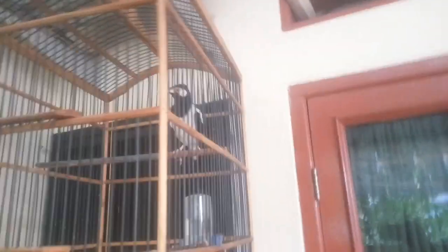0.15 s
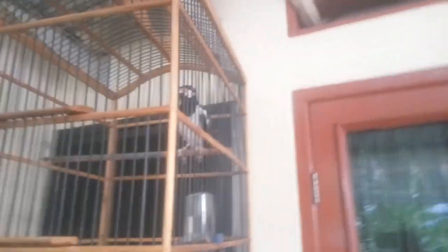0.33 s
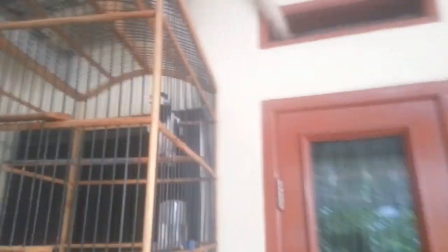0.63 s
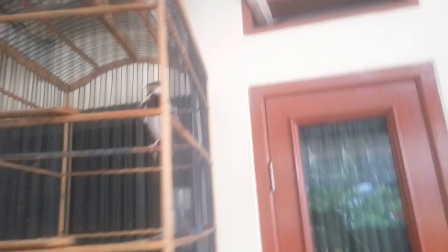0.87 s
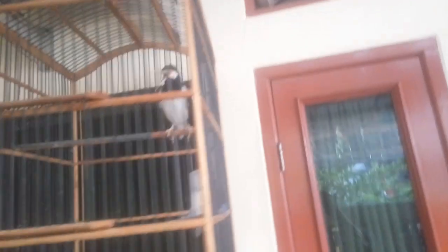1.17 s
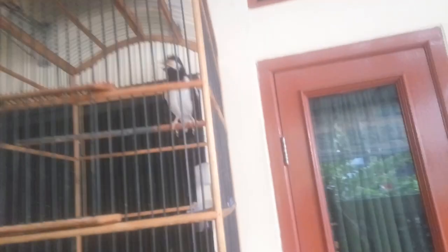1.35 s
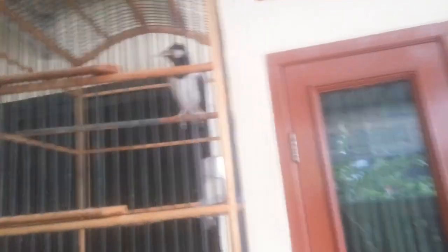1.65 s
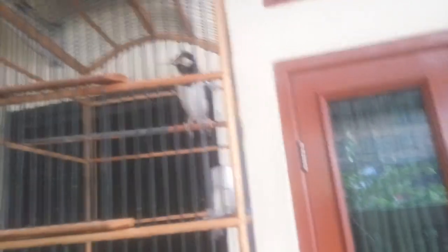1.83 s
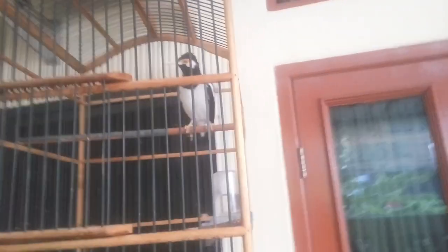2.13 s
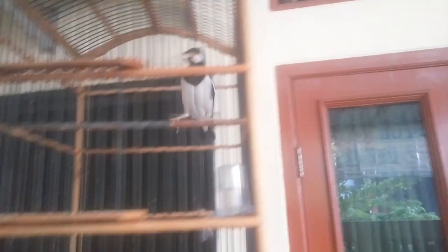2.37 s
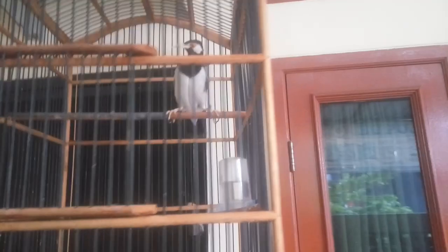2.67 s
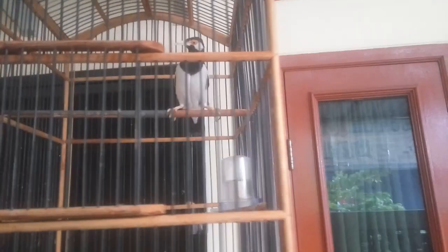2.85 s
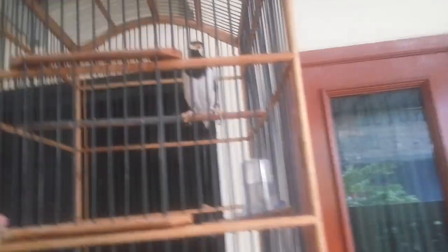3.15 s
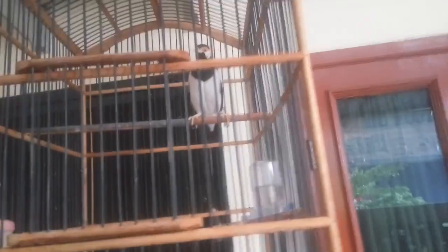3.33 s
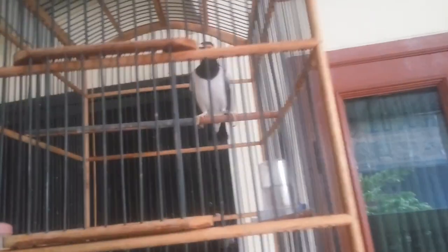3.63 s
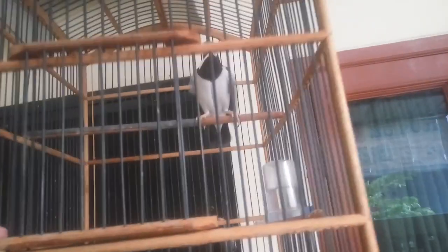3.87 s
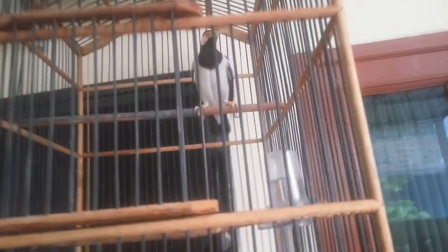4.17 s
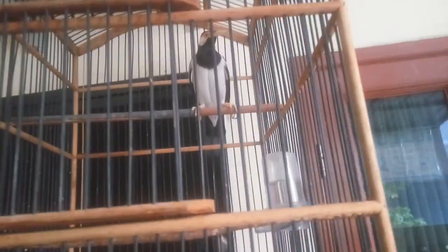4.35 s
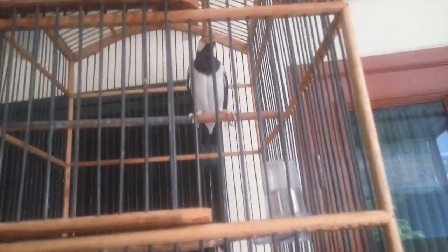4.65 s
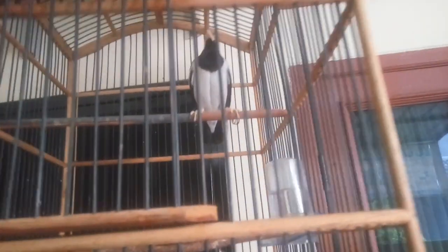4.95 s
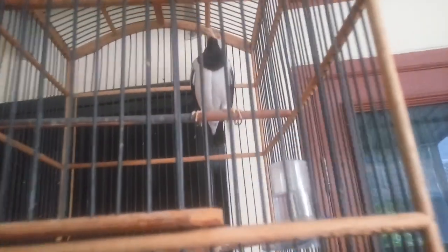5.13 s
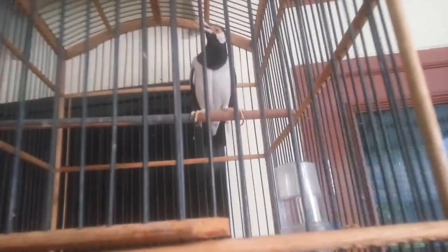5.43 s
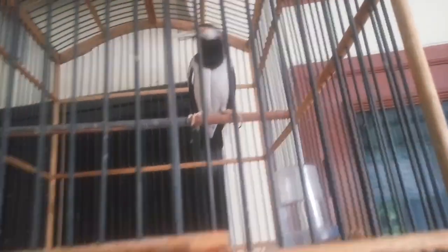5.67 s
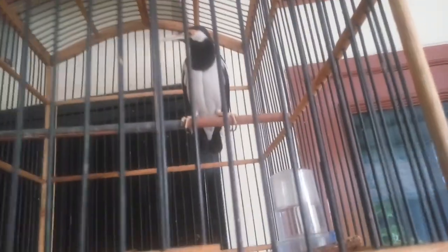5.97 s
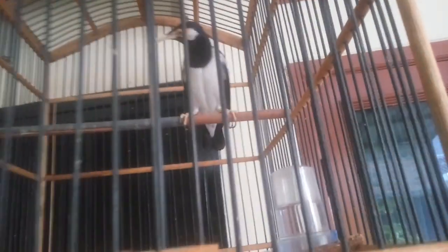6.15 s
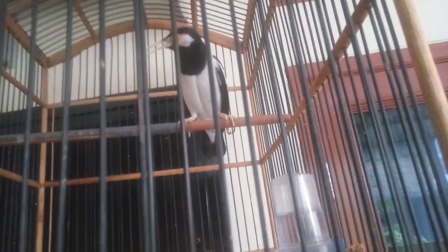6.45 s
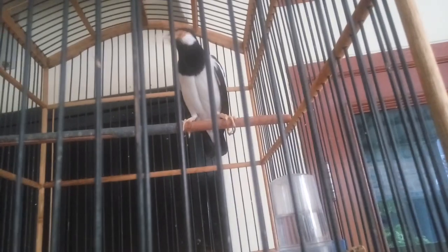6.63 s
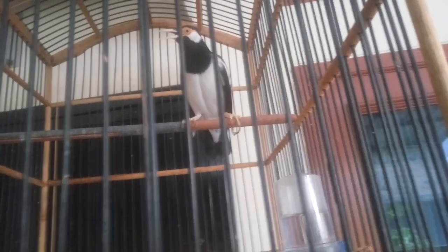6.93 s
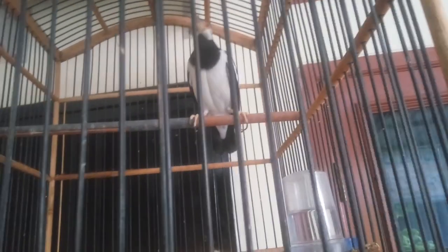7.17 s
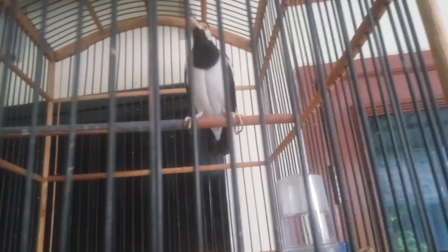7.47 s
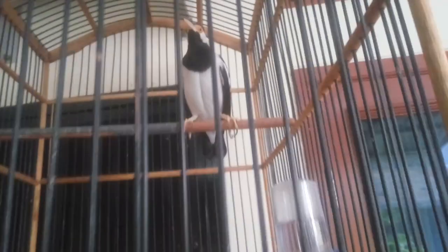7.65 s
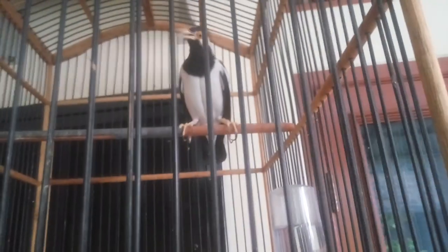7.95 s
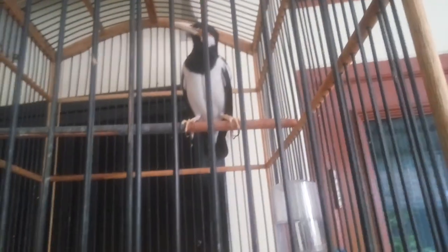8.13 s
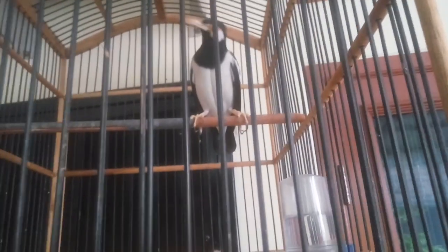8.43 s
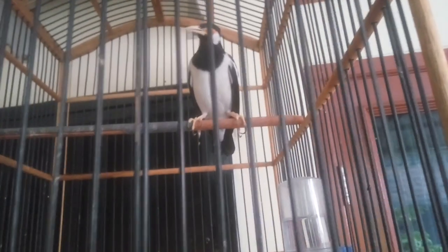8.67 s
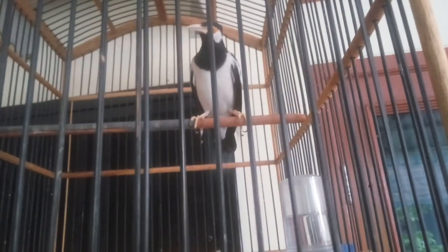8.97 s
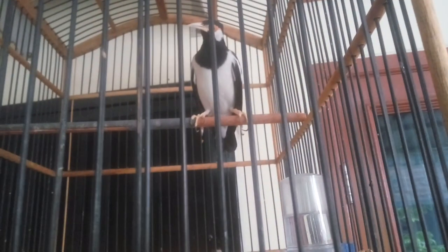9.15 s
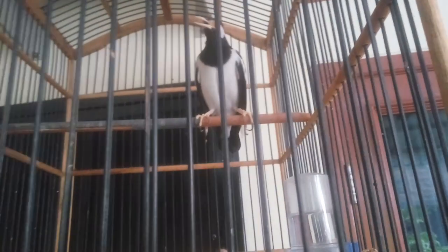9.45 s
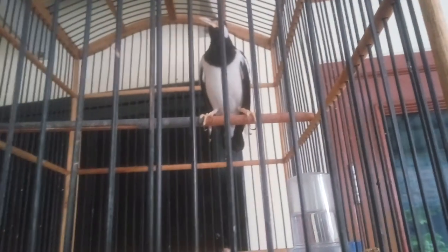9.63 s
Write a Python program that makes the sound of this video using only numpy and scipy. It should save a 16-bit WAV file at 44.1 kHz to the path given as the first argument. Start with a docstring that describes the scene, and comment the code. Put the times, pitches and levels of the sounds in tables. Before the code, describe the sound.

A caged starling calls in a hard-walled, echoing place. It opens with a quick warble, bright peeps, a fast sinking trill and rough squawks, then something wooden bangs and rattles. Afterwards come rolling churrs and loud, pure down-slurred whistles separated by pauses. The microphone moves closer, so the echo thins. A low hum and soft airy noise stay underneath, with faint distant hoots.

```python
"""Caged starling in a hard-walled room

Warbles, a shrill trill, rolling churrs and down-slurred whistles: one gliding tone shaped by throat and beak.
The reverberation thins as the microphone moves closer. Something wooden bangs and rattles once, as decaying
modes plus noise cracks. Wavering sines hum on in filtered-noise air; another bird hoots far away.
"""
import sys
import numpy as np
from scipy import signal
from scipy.fft import rfft, irfft, next_fast_len
from scipy.io import wavfile
from scipy.ndimage import uniform_filter1d, minimum_filter1d

SR = 44100
rng = np.random.default_rng(int(sys.argv[2]) if len(sys.argv) > 2 else 0)


def wav_out(sig):
    """Save sig, one row per channel (or a flat mono array), as 16-bit PCM at SR to the path in sys.argv[1]."""
    wavfile.write(sys.argv[1], SR, np.round(np.clip(np.atleast_2d(sig).T, -1, 1) * 32767).astype(np.int16))


N = 432621
LEAD = SR // 4  # run-up in samples, so that the room already rings at the start


def amp(db):
    """Decibels to gain."""
    return 10 ** (np.asarray(db) / 20)


def unit(x):
    """Scales to rms 1."""
    return x / np.sqrt(np.mean(x ** 2) + 1e-20)


def read(points, hz):
    """Reads a spectrum on a log-frequency axis."""
    point_hz, value = np.transpose(points)
    return np.interp(np.log(hz + 1), np.log(point_hz + 1), value)


def colour(x, points):
    """Filters x by a spectrum in dB."""
    size = next_fast_len(x.shape[-1] + 2048)
    gain = amp(read(points, np.fft.rfftfreq(size, 1 / SR)))
    return irfft(rfft(x, size) * gain, size)[..., :x.shape[-1]]


def wander(size, knots_per_s):
    """Random drift of about unit size: straight lines between random knots."""
    at = np.arange(size) * abs(knots_per_s) / SR
    knots = rng.standard_normal(size // 16 + 2)
    return np.interp(at, np.arange(len(knots)), knots)


def sine(hz_track):
    """Unit-rms sine whose phase integrates a pitch track."""
    return np.sqrt(2) * np.sin(2 * np.pi * np.cumsum(hz_track) / SR)


def add(mix, start_s, sound):
    """Adds a sound to a track that begins with the run-up."""
    part = mix[max(LEAD + round(start_s * SR), 0):][:len(sound)]
    part += sound[:len(part)]


def ports(x):
    """Direct sound reaches the left microphone first."""
    return np.array([x, np.roll(x, 28)])


# Room decay: freq_hz, t60_s
ROOM_T60 = [(200, 0.71), (800, 0.5), (2500, 0.43), (4000, 0.42), (7000, 0.42), (9000, 0.15), (15000, 0.18)]


def reverberate(x, build_s=0.0021):
    """Two unrelated tails of dense reflections, each band dying at its own speed."""
    taps = rng.standard_normal((2, SR)) * (rng.random((2, SR)) < 1 / 8)
    hz, t, bands = signal.stft(taps, SR, nperseg=256)
    decay = amp(-60 * t / read(ROOM_T60, hz)[:, None])
    tail = signal.istft(bands * decay, SR, nperseg=256)[1]
    tail *= 1 - np.exp(-(np.arange(tail.shape[1]) / SR / build_s) ** 2)
    # unit gain in the bird's own band, 2-5 kHz
    gain = np.sqrt(np.mean(abs(rfft(tail, SR)[:, 2000:5000]) ** 2))
    return signal.fftconvolve(x[None], tail / gain, axes=1)[:, :len(x)]


# Room air, relative spectrum: freq_hz, density_db_per_hz
AIR = [(20, -33), (50, -16.5), (150, -13), (215, -7.5), (260, -12.5), (330, -15), (440, -17), (690, -21),
       (870, -21.5), (1050, -23.5), (2500, -30.5), (4500, -35.5), (6800, -32.5), (8300, -46.5),
       (15500, -58.5)]
# Room air, rms level: time_s, level_db
AIR_DB = [(0, -61), (2.9, -59), (4.5, -62), (9.8, -62)]
# Hum partials: freq_hz, level_db
HUM = [(216.5, -62), (436, -74), (1179, -78), (1227, -84.5)]


def background(likeness=0.47, waver_hz=1.6, flutter=0.16):
    """Room air as partly shared stereo noise; hum as sines wavering in pitch and level."""
    t = np.arange(LEAD + N) / SR
    left, other = colour(rng.standard_normal((2, len(t))), AIR)
    same = np.clip(likeness, 0, 1)
    right = same * left + np.sqrt(1 - same ** 2) * other
    air = unit(np.array([left, right])) * amp(np.interp(t, *np.transpose(AIR_DB)))
    hum = 0
    for hz, db in HUM:
        level = amp(db) * (1 + flutter * wander(len(t), 40))
        hum = hum + level * sine(hz + waver_hz * wander(len(t), 5.5))
    return air + hum


# Throat and open beak, relative response: freq_hz, level_db
THROAT = [(1000, -24.5), (1400, -11), (1900, -11), (2300, -5.5), (2700, 0.5), (4200, -1.5), (5000, -8),
          (6200, 1), (7400, -10.5), (8200, -20), (9200, -22), (11000, -17), (13000, -18.5), (15500, -19)]


def note(gesture, hz, db, overtones, jitter=.007, shimmer=.08, pressing=.3):
    """One gliding tone; each harmonic swells and fades as it sweeps across the throat's resonance."""
    when_s, factor, effort_db = np.transpose(gesture)
    t = np.arange(when_s.min(), when_s.max(), 1 / SR)
    glide = uniform_filter1d(np.interp(t, when_s, factor), size=60)
    pitch = hz * glide * (1 + jitter * wander(len(t), 700))
    phase = 2 * np.pi * np.cumsum(pitch) / SR
    effort = np.interp(t, when_s, effort_db)
    # the harder the push, the richer the tone
    levels = [0] + [level + pressing * effort for level in overtones]
    tone = 0
    for k, level in enumerate(levels, 1):
        audible = k * pitch < SR / 2
        tone = tone + amp(level + read(THROAT, k * pitch)) * audible * np.sin(k * phase)
    tone *= amp(effort) * (1 + shimmer * wander(len(t), 460))
    tone *= signal.windows.tukey(len(t), 140 / len(t))
    peak_rms = np.sqrt(uniform_filter1d(tone ** 2, size=300).max())
    return amp(db) * tone / peak_rms


PULSE_SPREAD_DB, PULSE_DETUNE = 2.02, .008  # chance differences: level, share of pitch


def sing(song_notes):
    """Lays notes (start_s, gesture, pitch_hz, level_db, overtones, ..) on a track, each varied by chance."""
    track = np.zeros(LEAD + N)
    for start_s, gesture, hz, db, *voice in song_notes:
        detune, spread = rng.standard_normal(2)
        varied_hz = hz * (1 + PULSE_DETUNE * detune)
        varied_db = db + PULSE_SPREAD_DB * spread
        add(track, start_s + gesture[0][0], note(gesture, varied_hz, varied_db, *voice))
    return track


def cage(x, level_db=1.5, t60_s=0.027):
    """Thin bars scatter the call into a brief, dense spray of echoes."""
    t = np.arange(SR // 16) / SR
    taps = rng.standard_normal((2, len(t))) * amp(-60 * t / t60_s) * (t > .003)
    taps /= np.linalg.norm(taps[0])
    return amp(level_db) * signal.oaconvolve(x[None], taps, axes=1)[:, :len(x)]


# Reflections from cage and near wall: delay_s, gain
ECHOES = [(.00224, 0.21), (.00261, 0.2), (.00324, 0.17), (.0048, 0.27), (.0078, .12), (0.0156, 0.13),
          (0.0232, 0.12)]
# Reverberation send, falling as the microphone nears: time_s, level_db
WET = [(0, -8.5), (1.199, -10.5), (2, -11.5), (3.498, -14.5), (6, -14), (9.8, -15.5)]
# Beak points away, so the room gets more treble: freq_hz, level_db
SPILL = [(1400, 0), (2000, 5.5), (2700, 6.5), (3600, 6), (4500, 4), (5800, 3.5), (7200, 5), (9000, 5.5),
         (15000, 3)]


def starling(direct_db=-2.8):
    """All notes, then the cage's quick reflections and the room."""
    song = sing([*whistles(), *warbles(), *single_notes(), *trill(), *churrs()])
    near = song + sum(gain * np.roll(song, round(delay_s * SR)) for delay_s, gain in ECHOES)
    wet_db = np.interp((np.arange(LEAD + N) - LEAD) / SR, *np.transpose(WET))
    spilled = colour(song, SPILL) * amp(wet_db)
    return amp(direct_db) * ports(near) + cage(spilled) + reverberate(spilled)


# Overtones by note, relative to fundamental before throat and effort: h2_db, h3_db, h4_db, h5_db
OVERTONES = {"churr": [-17, -39, -32.5, -34], "arch": [-13, -19.5, -39, -28], "squawk": [2.5, -6.5, -31.5,
             -18], "peep": [-12, -31, -49, -45.5], "scoop": [-7, -14.5, -30.5, -33], "chirrup": [-41.5, -44,
             -70, -35], "whistle": [-13.5, -22.5, -32, -44]}
# Whistles: start_s, settled_pitch_hz, level_db, starting_pitch_factor
WHISTLES = [(-.135, 3680, -11.5, 1.5), (3.935, 3450, -5, 1.65), (5.589, 3460, -6, 1.44),
            (7.189, 3450, -5.8, 1.46)]
SLUR_S, WHISTLE_SOFT_DB, WHISTLE_RISE_S = .0135, -5.5, 0.0082  # opening downslur, attack
FLICK_AT_S, FLICK_HALF_S, FLICK_RISE, FLICK_DB = .068, .009, 1.12, -10  # rise: share of pitch added
PLUNGE_AT_S, PLUNGE_S, PLUNGE_DROP, PLUNGE_DB = .073, 0.034, 0.61, -34  # drop: share of pitch lost


def whistles(jitter=0.0037, shimmer=0.14, bend=2.3, release=3.6):
    """A downslur settles on a loud, nearly pure tone, flicks up and back, and plunges away."""
    t = np.arange(0, PLUNGE_AT_S + PLUNGE_S, 1 / SR)
    flick = np.maximum(1 - abs(t - FLICK_AT_S) / FLICK_HALF_S, 0)
    plunge = np.maximum(t - PLUNGE_AT_S, 0) / PLUNGE_S
    effort = WHISTLE_SOFT_DB * np.exp(-t / WHISTLE_RISE_S)
    effort += FLICK_DB * np.sqrt(flick) + PLUNGE_DB * plunge ** release
    for start_s, hz, db, first_factor in WHISTLES:
        slur = (first_factor - 1) * np.exp(-t / SLUR_S)
        factor = 1 + slur + FLICK_RISE * flick - PLUNGE_DROP * plunge ** bend
        gesture = np.column_stack([t, factor, effort])
        yield start_s, gesture, hz, db, OVERTONES["whistle"], jitter, shimmer


def pulse_times(length_s, gap_s):
    """Evenly spaced pulses, about gap_s apart, that fill a call."""
    return np.linspace(0, length_s, max(round(length_s / gap_s), 1) + 1)


# Syrinx gesture: when_s, pitch_factor, effort_db
ARCH = [(-.020, .5, -18), (-.014, .68, -6), (-.008, .83, 1), (-.001, 1, -1), (.005, .85, 2),
        (.011, .67, -1), (.017, .52, -5), (.022, .45, -12)]
# Warbles: start_s, first_to_last_arch_s, pitch_hz, level_db, first_pitch_factor, first_relative_db
WARBLES = [(.444, .206, 2950, -16, .83, -11.5), (1.456, .164, 2920, -17, .97, -1)]
WARBLE_GAP_S = .041


def warbles(last_db=-2.0, jitter=.006, purity=0.89):
    """Even chains of arches; the first is lower, softer and so purer, the last slackens."""
    for start_s, length_s, hz, db, first_factor, first_db in WARBLES:
        for t in pulse_times(length_s, WARBLE_GAP_S):
            soft_db = first_db * (t == 0) + last_db * (t == length_s)
            pitch = hz if t else hz * first_factor
            overtones = np.array(OVERTONES["arch"]) + purity * soft_db
            yield start_s + t, ARCH, pitch, db + soft_db, overtones, jitter


# Syrinx gestures: when_s, pitch_factor, effort_db
PEEP = [(0, 1.56, -14), (.0025, 1.25, -4), (.005, 1.08, -1), (.009, 1.01, 0), (.016, 1, -1),
        (.020, 1.02, -6), (.023, 1.05, -22)]
SQUAWK = [(-.007, 0.93, -13), (-.001, 0.83, -22), (.004, 1, -11.5), (.009, .71, -2.5), (0.017, .6, -4.5),
          (0.02, .54, -1.5), (.029, 0.29, -10.5)]
CHIRRUP = [(0, .35, -1.5), (.012, 0.54, -0.5), (.022, .94, -16.5), (0.036, 0.71, 4.5), (0.048, .53, 4.5),
           (.060, 0.62, 6), (.070, 1, -7.5), (.082, .72, 9.5), (0.096, .58, 9.5), (0.104, 0.77, -4)]
# Single notes: start_s, pitch_hz, level_db
PEEPS = [(.861, 4097, -7), (.901, 3980, -9.5), (.940, 3617, -12.5)]
SQUAWKS = [(1.306, 2212, -23.5), (1.408, 2210, -21)]
CHIRRUPS = [(1.944, 2926, -23)]


def single_notes():
    """Peeps before the trill, squawks after it, and one chirrup: one syrinx gesture each."""
    kinds = [("peep", PEEP, PEEPS), ("squawk", SQUAWK, SQUAWKS), ("chirrup", CHIRRUP, CHIRRUPS)]
    for name, gesture, notes in kinds:
        for start_s, hz, db in notes:
            yield start_s, gesture, hz, db, OVERTONES[name]


# Syrinx gesture at the settled gap: when_s, pitch_factor, effort_db
SCOOP = [(0, 2.05, -6), (.003, 1.58, 2), (.006, 1.22, 0), (.010, 1.02, -5), (.013, 1, -6), (.016, 1.14, -2),
         (.019, 1.42, 0), (.023, 1.85, -10)]
TRILL_START_S, TRILL_GAP_S, TRILL_FIRST_GAP_S, TRILL_QUICKENING = .977, .0255, .033, .53
TRILL_FIRST_HZ, TRILL_END_HZ, TRILL_SINK_S = 3280, 2816, .05
TRILL_DB, TRILL_FADE_DB_PER_S = -15.5, 13.5


def trill(count=9, rasp_db=-60, jitter=0.0093):
    """Quickening scoops, each stretched with its gap, that turn harsher as their pitch sinks."""
    gaps = TRILL_GAP_S + (TRILL_FIRST_GAP_S - TRILL_GAP_S) * TRILL_QUICKENING ** np.arange(count)
    for t, gap in zip(np.cumsum(gaps) - gaps, gaps):
        hz = TRILL_END_HZ + (TRILL_FIRST_HZ - TRILL_END_HZ) * np.exp(-t / TRILL_SINK_S)
        overtones = np.array(OVERTONES["scoop"]) + rasp_db * np.log(hz / 2950)
        gesture = np.array(SCOOP) * [gap / TRILL_GAP_S, 1, 1]
        yield TRILL_START_S + t, gesture, hz, TRILL_DB - TRILL_FADE_DB_PER_S * t, overtones, jitter


# Far hoots: start_s, length_s, starting_pitch_hz, level_db
HOOTS = [(1.468, 0.069, 973, -55.5), (1.872, 0.068, 985, -60), (5.252, 0.065, 1010, -52.5),
         (5.355, 0.051, 930, -55.5), (5.725, .053, 935, -54), (8.313, 0.16, 1053, -54),
         (8.761, 0.1, 990, -59.5)]
HOOT_SAG_HZ_PER_S = 1200


def far_bird(direct_db=-4, room_db=-2, waver=0.015):
    """Soft, nearly pure hoots that sag in pitch."""
    track = np.zeros(LEAD + N)
    for start_s, length_s, hz, db in HOOTS:
        size = round(length_s * SR)
        sagging = hz - HOOT_SAG_HZ_PER_S * np.arange(size) / SR
        pitch = sagging * (1 + waver * wander(size, 120))
        add(track, start_s, amp(db) * sine(pitch) * signal.windows.tukey(size, .5))
    return amp(direct_db) * ports(track) + amp(room_db) * reverberate(track)


# Two soft nudges, the bang, two late taps: start_s, level_db, crack_relative_db
BLOWS = [(2.234, -14, -19), (2.276, -6, -14), (2.338, -5, 0), (2.350, 5.5, 0), (2.378, 6, -6),
         (2.785, -21, -23), (2.935, -28, -19)]
# Modes of the wood: freq_hz, level_db, t60_s
WOOD = [(215, -11.5, 0.15), (288.1, -7.5, 0.124), (448.4, -6.5, 0.23), (554, 4, 0.11), (593, -7, 0.071),
        (678.6, 1.5, 0.13), (835, -4, 0.15), (980, -9, 0.059), (1124, -13, 0.047), (1400, -9, 0.03)]
# Crack, relative spectrum: freq_hz, level_db
CRACK = [(30, -35), (130, -32), (220, -4), (600, 2), (1500, -4.5), (2100, -10), (3500, -12), (5500, -7.5),
         (7000, -13.5), (9000, -28), (12000, -34.5), (15000, -37)]


def bang(ring_db=-33.5, crack_db=-25.2, crack_t60_s=0.17, room_db=-2, detune=.008):
    """Each blow rings slightly detuned wood modes and a short noise crack, direct and through the room."""
    track, t = np.zeros(LEAD + N), np.arange(SR // 3) / SR
    attack = 1 - np.exp(-t / 0.001)
    for start_s, db, hardness_db in BLOWS + rattle():
        ring = 0
        for hz, level, t60_s in WOOD:
            mode_hz = hz * (1 + detune * rng.standard_normal())
            phase = 2 * np.pi * (mode_hz * t + rng.random())
            ring = ring + amp(level - 60 * t / t60_s) * np.sin(phase)
        crack = unit(colour(rng.standard_normal(len(t)), CRACK)) * amp(-60 * t / crack_t60_s)
        blow = amp(ring_db) * ring + amp(crack_db + hardness_db) * crack
        add(track, start_s, amp(db) * blow * attack)
    return ports(track) + amp(room_db) * reverberate(track)


RATTLE_START_S, RATTLE_GAP_S = 2.43, .065
RATTLE_DB, RATTLE_FADE_DB_PER_S, RATTLE_CRACK_DB = -9.5, 58.5, -19


def rattle(count=5, unevenness=0.19, spread_db=2):
    """Uneven knocks that die away as the wood settles: start_s, level_db, crack_relative_db."""
    late, strong = rng.uniform(-1, 1, (count, 2)).T
    after_s = RATTLE_GAP_S * (np.arange(count) + unevenness * late)
    level_db = RATTLE_DB - RATTLE_FADE_DB_PER_S * after_s + spread_db * strong
    return [(RATTLE_START_S + t, db, RATTLE_CRACK_DB) for t, db in zip(after_s, level_db)]


# Syrinx gestures, opening and rolling upslurs: when_s, pitch_factor, effort_db
LIFT = [(.005, .66, -4), (.010, .84, 1), (.016, 1, 0), (.020, 1.1, -4), (.023, 1.5, -12), (.028, 1.5, -15),
        (.033, .9, -12)]
CHURR = [(-.002, .64, -11), (.001, .56, -6), (.0065, .9, -2), (.011, .98, 0), (.020, 1.03, 0),
         (.022, 1.09, -7), (.0235, 1.43, -13), (.027, 1.37, -12), (.034, .6, -10)]
# Churrs: start_s, first_to_last_pulse_s, full_pitch_hz, full_level_db
CHURRS = [(3.017, .099, 2590, -18.5), (3.628, .199, 2740, -11.3), (5.208, .167, 2650, -14.7),
          (6.406, .165, 2650, -16), (6.81, .163, 2740, -12), (7.965, .165, 2660, -15.8),
          (8.768, .166, 2690, -12.8), (9.388, .159, 2720, -14)]
CHURR_GAP_S = .033
CHURR_FLAT, CHURR_CLIMB_S = .22, .043  # share of pitch below full at the start
CHURR_SOFT_DB, CHURR_ATTACK_S, CHURR_LAST_DB = -18.5, .077, -3.5  # soft start, slack last pulse
CHURR_JITTER = 0.023  # share of pitch


def churrs(opening_db=-14, swell_power=2.16):
    """Each churr opens with a soft, pure upslur, then rolls on, climbing and swelling to its full voice."""
    for start_s, length_s, hz, db in CHURRS:
        for t in pulse_times(length_s, CHURR_GAP_S):
            pitch = hz * (1 - CHURR_FLAT * np.exp(-t / CHURR_CLIMB_S))
            swell_db = CHURR_SOFT_DB * max(1 - t / CHURR_ATTACK_S, 0) ** swell_power
            level = db + swell_db + CHURR_LAST_DB * (t == length_s)
            overtones = np.array(OVERTONES["churr"]) + opening_db * (t == 0)
            yield start_s + t, CHURR if t else LIFT, pitch, level, overtones, CHURR_JITTER


def scene():
    """Everything in the room, with the run-up dropped."""
    return (background() + starling() + far_bird() + bang())[:, LEAD:]


def limit(x):
    """A quick limiter turns down peaks that near full scale."""
    room = np.minimum(1, .97 / (abs(x).max(0) + 1e-9))
    return x * uniform_filter1d(minimum_filter1d(room, size=201), size=201)


# Muffled right microphone: freq_hz, level_db
RIGHT_PORT = [(100, -14.5), (2400, -12), (4400, -17), (6500, -34), (8200, -26), (15000, -13.5)]
EDGE_HZ = 15600


def record(dry):
    """The right microphone is weak, dull and of opposite polarity; then limiter and band limit."""
    pair = limit(np.array([dry[0], -colour(dry[1], RIGHT_PORT)]))
    lowpass = signal.firwin(511, EDGE_HZ, window=("kaiser", 9), fs=SR)
    return signal.oaconvolve(pair, lowpass[None], "same")


dry = scene()
out = record(dry)
wav_out(out)
```